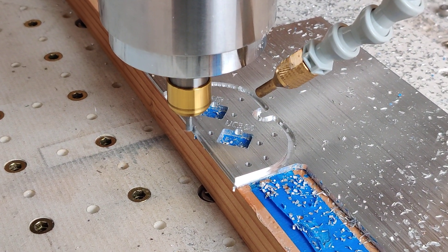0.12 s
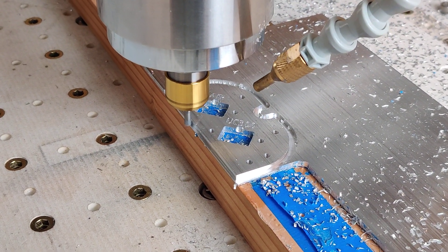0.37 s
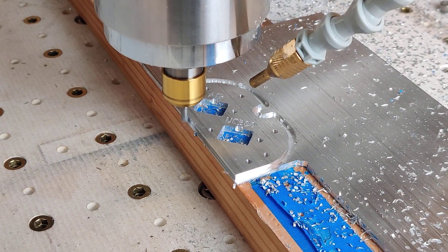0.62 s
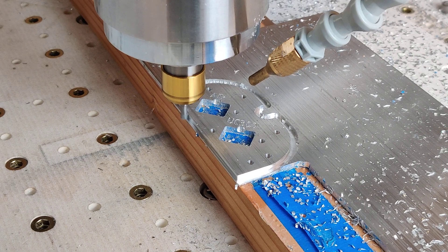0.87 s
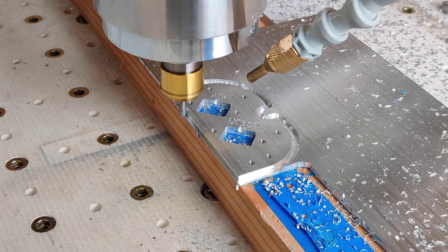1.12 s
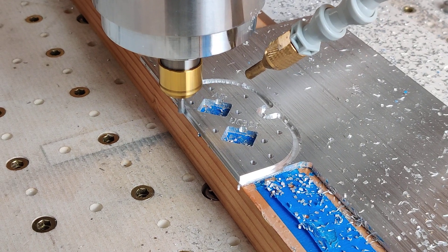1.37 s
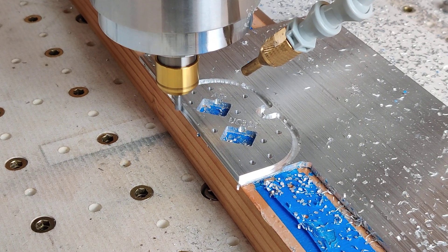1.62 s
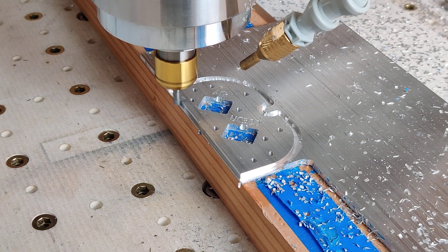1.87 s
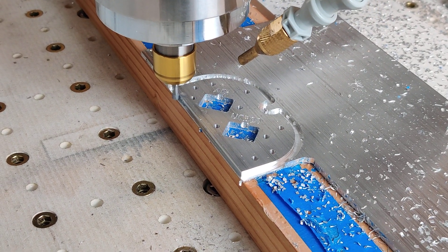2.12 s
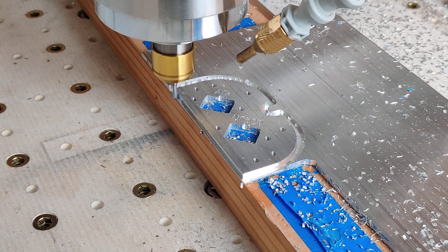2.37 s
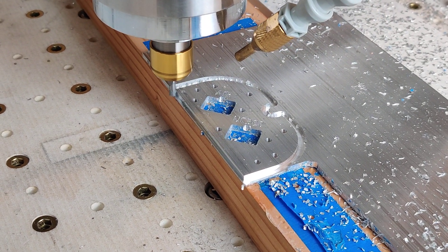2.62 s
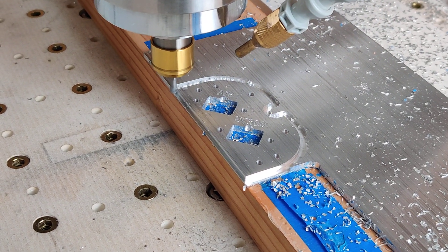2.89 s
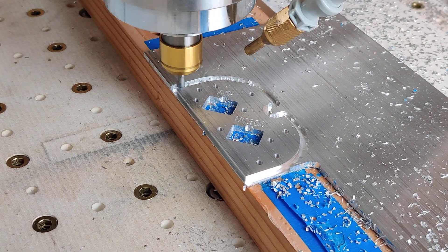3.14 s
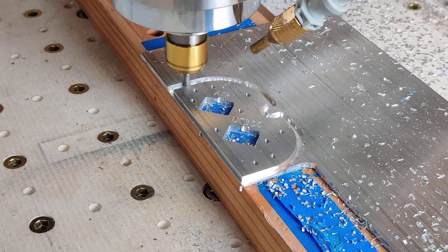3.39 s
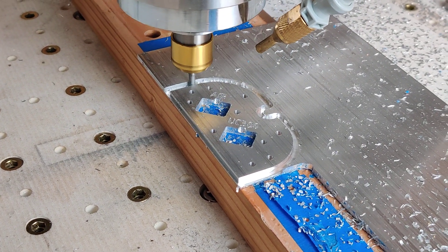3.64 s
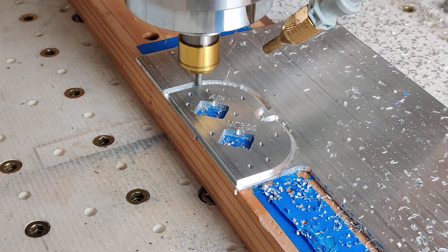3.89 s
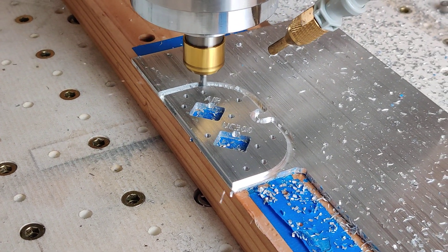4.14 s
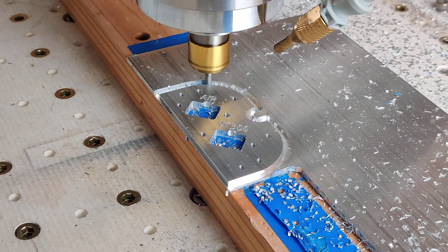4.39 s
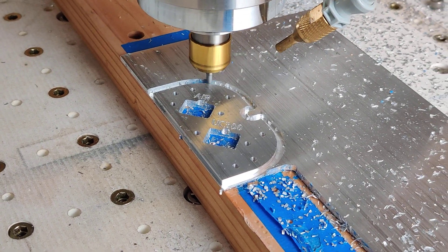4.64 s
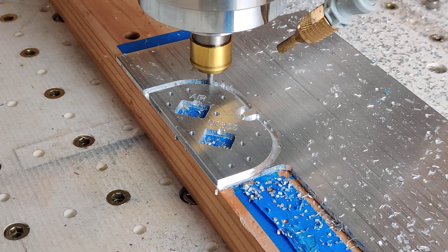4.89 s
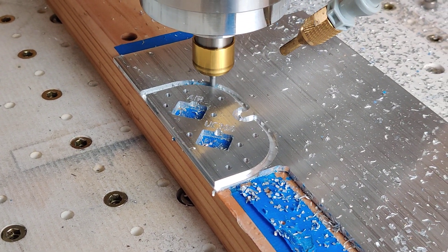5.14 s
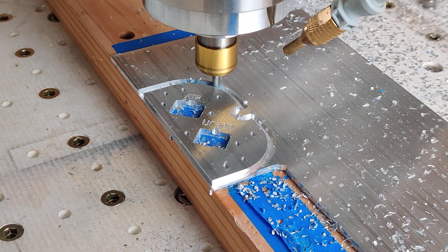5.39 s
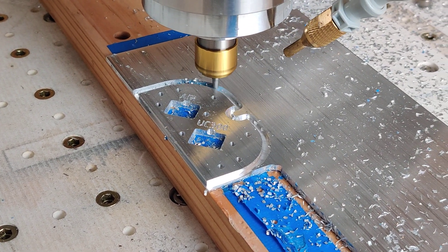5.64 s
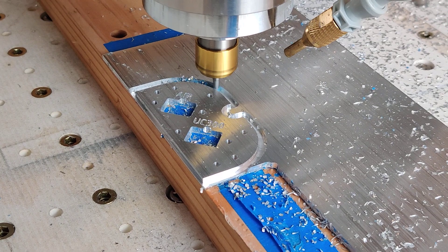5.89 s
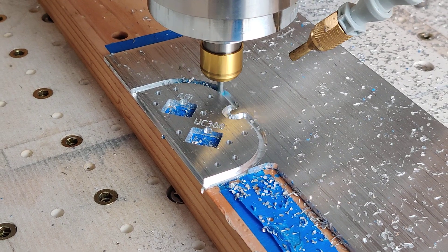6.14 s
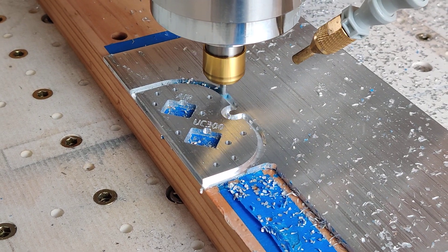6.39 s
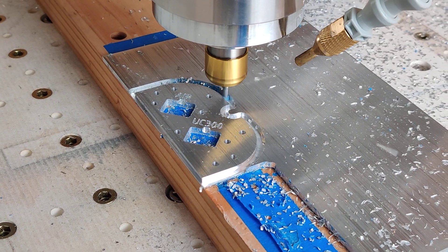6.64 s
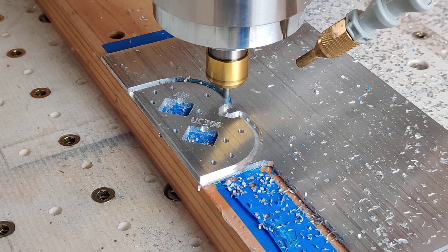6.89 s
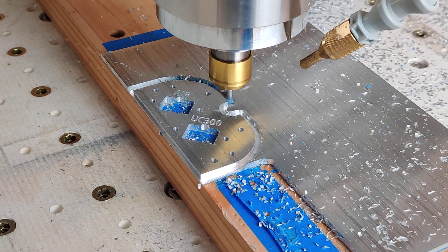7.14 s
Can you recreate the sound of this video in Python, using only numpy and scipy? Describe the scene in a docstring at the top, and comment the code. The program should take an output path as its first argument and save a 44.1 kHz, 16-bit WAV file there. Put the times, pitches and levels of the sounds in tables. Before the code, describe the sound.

Continuous workshop machining, heard in close stereo: an air nozzle hisses brightly, heavier on the right, with a thin high whistle. A spinning cutter drones on one fixed pitch in metal, rough with chips and shimmering overtones. It fades slightly, surges abruptly at three seconds, then settles to a middling level with flutter and brief knocks. Low compressor throbbing and mains hum remain faint underneath.

```python
"""Router milling aluminium

A router spindle turns nearly 400 times a second and its single flute mills an aluminium plate close to
a two-port microphone. The flute strikes once a turn, so the plate sings that rate and its overtones, while
torn chips ring the plate and knocks rattle in the groove. An air nozzle hisses and whistles on the cutter,
the drive whistles and a piston compressor throbs across the workshop with mains hum and a fan."""
import sys
import numpy as np
from scipy import signal
from scipy.fft import rfft, irfft
from scipy.io import wavfile
from scipy.ndimage import uniform_filter1d, map_coordinates

SR = 44100
rng = np.random.default_rng(int(sys.argv[2]) if len(sys.argv) > 2 else 0)


def level_to_linear(level):
    """Convert decibel levels to linear amplitude factors, elementwise."""
    exponent = np.asarray(level, float) / 20
    return 10 ** exponent


def output_pcm(signal):
    """Save a mono or channel-first signal as 16-bit PCM at the path in sys.argv[1].

    Samples are clipped to [-1, 1] before scaling.
    """
    pcm = np.clip(np.atleast_2d(signal).T, -1, 1) * 32767
    wavfile.write(sys.argv[1], SR, np.round(pcm).astype(np.int16))


N = 320166
TIME = np.arange(N) / SR
SIDES = np.array([[1], [-1]])  # left, right

# spindle: turns per second unloaded, and the sag when the strike is as loud as FULL_CUT_DB
FREE_HZ, SAG_HZ, FULL_CUT_DB = 399.66, .8, -17.5
# the cutter rounds a corner of the plate and bites deeper from then on
CORNER_S, CORNER_TAKES_S = 3.03, .04
# flute strike at the turning rate: (time [s], level [dB], left minus right [dB])
STRIKE = [(0, -28, -3), (.6, -28.5, -4.5), (1.4, -30, -5.5), (2.3, -32, -6.5), (2.98, -34.5, -7.5),
          (3.11, -22, -6.5), (3.4, -19, -5.5), (4.0, -17, -4.5), (4.12, -19, -5), (4.55, -18.5, -7),
          (4.7, -20.5, -6), (4.85, -23.5, -7), (5.3, -24.5, -6.5), (5.45, -26.5, -8.5), (5.8, -23.5, -7),
          (6.05, -27, -7), (6.5, -26, -8.5), (6.65, -23, -7), (6.9, -26, -8), (7.26, -25.5, -8)]
STRIKE_LEAD = 0.424  # left ahead of right [radians]
# brief dropouts of the strike tone: (time [s], half length [s], depth [0-1])
DROPOUTS = [(.49, .015, .3), (4.62, .015, .4), (6.715, .016, .6), (7.14, .020, .6)]
# an overtone swells while the cutter crosses a spot of the plate that favours it, on one side of the corner:
# (multiple of the turning rate, left [dB], right [dB], centre of swell [s], half length [s])
OVERTONES = [(2, -27.5, -23, 0.0, 0.963), (2, -40, -45.5, 2.5, 0.56), (2, -66.5, -33, 3.5, 0.674),
             (2, -23, -60, 4, 0.947), (2, -43.5, -32, 6, 1.22), (2, -30.5, -28, 7, 0.382),
             (3, -40, -32, 0.5, 0.64), (3, -33, -59.5, 4.5, 0.81), (3, -71.5, -31, 4.5, 0.965),
             (3, -49, -27.5, 6.5, 1.534), (4, -32.5, -33.5, 0.0, 3.1), (4, -39, -31.5, 1.81, 0.57),
             (4, -32, -41.5, 3.5, 1.41), (4, -41.5, -40, 5, 1.07), (4, -35.5, -43.5, 7, 1.97),
             (5, -29.0, -31, 0.5227, 1.5), (5, -51.5, -42.0, 3, 0.18), (5, -37.5, -39.5, 4.5, 4.4),
             (5, -38.5, -38.5, 4.5, 0.263), (5, -43, -39.5, 5.5, 0.506), (6, -51.5, -43.5, -0.9, 3.49),
             (6, -55, -42, 2, 0.4), (6, -47, -37, 3, 4.3), (7, -48, -32, 0.0, 0.695),
             (7, -33.5, -33.5, 1.3063, 1.19), (7, -45.5, -45.5, 4.5, 0.268), (7, -39.5, -38, 5.5, 3.07),
             (8, -38.5, -60.0, -0.5, 0.7), (8, -56, -38.5, 3, 1.35), (8, -45, -32, 3.5, 1.09),
             (8, -42.0, -40.5, 2, 4.0), (9, -46, -51, 1.5, 3.0), (9, -45, -42, 4.0, 1.0),
             (10, -36, -33.5, -0.77, 2.3), (11, -55.5, -31, 0.91, 1.27), (11, -49.5, -37, 4, 0.86),
             (12, -38, -43.5, 0.93, 1.7), (13, -43.5, -33.5, 1.86, 0.49), (13, -49, -47.5, 7.5, 3.0),
             (14, -46.5, -40.5, 0.92, 1.22), (15, -57.5, -27.5, 0.0, 1.73), (15, -59.5, -42.0, 6.5, 1.54),
             (16, -56.5, -40.5, 2.35, 1.4), (16, -53, -37, 4, 0.82), (17, -51.5, -32, 0.82, 2.1),
             (17, -52, -45, 5, 2.3), (18, -49.0, -36.5, 1, 2.8), (19, -60.0, -33, 0.17, 0.97),
             (19, -55.5, -25, 1.87, 0.81), (19, -55, -35, 3.5, 1.53), (20, -45, -28.5, 2.16, 0.94),
             (21, -57.0, -33.5, 2.5, 0.6), (22, -55.0, -38.0, 3, 3.2), (22, -55.0, -40.0, 3.5, 3.0)]
# left lead of an overtone; unlisted multiples lead by chance:
# multiple of the turning rate: (before the corner [radians], after it [radians])
PLATE_LEADS = {3: (1.2, 2.2), 4: (-2.0, -1.9), 5: (-.4, -.9), 6: (.5, .7), 7: (.2, .1), 8: (3.0, 1.5),
               10: (1.5, 2.5), 12: (1.3, 2.0), 13: (1.9, 1.2), 15: (2.9, 2.9), 19: (-2.6, 3.0),
               20: (-.8, 3.0)}
# the octave's left lead turns as the cutter travels: (time [s], lead [radians])
OCTAVE_LEAD = [(0, -.25), (3.0, 1.0), (3.5, .6), (4.6, .9), (5.8, 3.1), (6.0, 2.8), (6.5, .3), (7.26, .3)]
LAG_TURNS = .027  # the plate delays the phase of overtone k by this times k squared, smearing the strike
# highest, faint overtones: (multiple of the turning rate, left [dB], right [dB])
TOP_OVERTONES = [(23, -60.5, -52), (25, -59, -52), (28, -57.5, -48), (30, -49.5, -46.5), (35, -51.5, -41),
                 (36, -48, -54.5), (37, -44, -51), (38, -46.5, -49.5), (39, -43.5, -49.5)]
# broad rings of plate and table under uneven chips: (centre [Hz], width [Hz], left [dB], right [dB])
PLATE_RINGS = [(436.9, 42, -7.5, -2), (748.5, 94, -7, -5.5), (875.4, 42, -20.5, -9), (1656, 265, -5, -9),
               (2005.5, 204, -1, -3), (3127, 216, -2.5, 0.5), (6270, 2450, -2.5, 7.5)]
CHIP_DB, CHIP_FOLLOW = -26.5, 0.81  # base level [dB], chip dB per dB of strike
# knocks of the cutter in the groove: (time [s], time scale of burst [s], low rings [dB], high rings [dB])
RATTLES = [(3.620, 0.01, -43, -27), (4.175, .03, -47.5, -28.5), (5.412, 0.0135, -37, -28.5),
           (5.440, 0.0074, -42, -21), (5.459, 0.0091, -30, -26.5), (5.542, 0.0087, -32, -21),
           (5.562, 0.0076, -45.5, -31), (5.619, .006, -41, -23), (5.634, 0.0124, -26, -37),
           (5.656, 0.0102, -27.5, -20.5), (5.680, 0.0081, -34, -33.5), (5.915, .008, -37, -28.5),
           (6.105, 0.0059, -42, -21.5), (6.806, .012, -34, -33), (6.835, 0.011, -38.5, -39)]
# rings of those knocks, three low then three high: (centre [Hz], width [Hz], level [dB])
RATTLE_RINGS = [(256, 152, -2.5), (500, 123, 3), (893, 182, 2), (1480, 418, -2.5), (2089, 244, -1),
                (2875, 1420, 2.5)]
# air jet: (time [s], level [dB], left minus right [dB])
JET = [(0, -21, -5.5), (.9, -20.5, -7), (1.2, -21, -7), (2.4, -21, -8), (3.0, -20, -7.5), (3.6, -21.5, -6),
       (4.6, -20.5, -8), (5.4, -21, -7.5), (6.5, -21, -6.5), (7.26, -20, -7.5)]
# jet colour at the left port: (frequency [Hz], density [dB per Hz])
JET_LEFT = [(30, -83.5), (150, -81), (600, -73.5), (850, -77.5), (1400, -68.5), (1800, -91), (2500, -65.5),
            (2900, -68.5), (4000, -61), (5000, -66), (5700, -72.5), (7500, -77.5), (9000, -67.5),
            (11000, -61.5), (12800, -62.5), (14300, -61.5), (15700, -53)]
# jet colour at the right port: (frequency [Hz], density [dB per Hz])
JET_RIGHT = [(30, -63), (150, -77.5), (600, -71), (850, -65.5), (1400, -68), (2500, -64.5), (3400, -64.5),
             (5000, -59), (7000, -57), (8000, -57), (9300, -65.5), (10200, -60), (11000, -55.5),
             (12500, -58), (14000, -57), (15700, -55.5)]
JET_BELOW_DB, JET_PAN_DB = -19, -6.5  # level and balance at which those colours hold
JET_FLOOR_HZ = 50
# likeness of the jet at the two ports: (frequency [Hz], share [0-1])
LIKENESS = [(60, .97), (300, .8), (700, .65), (1500, .4), (4000, .38), (9000, .5), (14000, .48)]
# paths by which the jet reaches the left port: (delay after the right port [s], gain)
JET_PATHS = [(-.00016, .7), (.00018, -.55), (-.00043, .45)]
# reflections of the jet off table, plate and spindle body, moving with the head:
# (first delay [s], last delay [s], gain)
JET_ECHOES = [(.00062, .00056, .1), (.0011, .0009, .12), (.0027, .0021, .14), (.0040, .0036, .14),
              (.0061, .0052, .12)]
# jet whistle at the right port, before the jet's own level: (time [s], centre [Hz], level [dB])
WHISTLE = [(0, 11690, -30), (1.2, 11720, -22), (2.9, 11990, -22.5), (3.4, 11730, -37), (4.2, 11850, -37),
           (4.7, 11900, -22.5), (5.2, 11950, -23.5), (5.6, 12000, -27), (6.4, 12430, -23),
           (7.26, 12400, -29.5)]
WHISTLE_WIDTH_HZ = 325
# switching tone of the drive: (time [s], level [dB])
DRIVE = [(0, -37.5), (1.2, -39), (2.1, -35.5), (2.8, -33), (3.2, -39), (3.6, -45.5), (7.26, -41)]
DRIVE_HZ = 6000.2
# compressor strokes: (multiple of the stroke rate, level over the hum level [dB])
STROKES = [(1, -18), (2, 0.5), (3, -11.5), (4, -6.5), (5, -17.5), (6, -20.5), (7, -6), (8, -11), (9, -21),
           (11, -21)]
STROKE_HZ = 28.62
# mains hum and a fan: (frequency [Hz], level over the hum level [dB])
HUMS = [(120.1, -10), (175, -12.5), (240.2, -20.5)]
# wavering level shared by strokes, hum and fan: (time [s], level [dB])
HUM_LEVEL = [(0.0, -42), (0.22, -42), (2.95, -40.5), (3.58, -43.5), (6.89, -42), (7.26, -42)]
HUM_PAN_DB = -6
# everything at a port dips or swells briefly: (time [s], left [dB], right [dB])
LEVEL_BUMPS = [(0.16, 1, 0.5), (0.59, -4.5, -0.46), (0.89, -2, 0.33), (1.45, 2.5, 1.36), (1.74, 0, 0.5),
               (2.3, -1, 0.4), (2.47, -0.5, -1.2), (2.84, -1.16, 1.18), (3.06, -1.86, 1.0),
               (4.17, 0.5, 0.5), (4.31, -2.9, -2), (4.5, 0.16, -2.5), (4.69, -2.5, 0), (4.82, 1.5, -1),
               (5.11, 2.4, 0.3), (5.28, 2, -0.85), (5.4, 0.14, 1.1), (5.69, -4.5, -1.48), (6.36, -3.02, -1),
               (6.77, 0.33, 1.51), (7.06, -2, -1.66)]
BUMP_HALF_S = 0.0615
TOP_HZ = 15745


def curves(table):
    """Columns of a table, joined by straight lines in time."""
    s, *columns = np.transpose(table)
    return [np.interp(TIME, s, column) for column in columns]


def pair(left, right):
    """A left and a right value, stacked as two rows."""
    return np.array([[left], [right]])


def ports(pan_db):
    """Left and right gains whose mean is one."""
    ratio = level_to_linear(pan_db)
    left, right = 2 * ratio / (1 + ratio), 2 / (1 + ratio)
    return np.reshape(np.array([left, right]), (2, -1))


def walk(rate):
    """Random levels held 1 / rate s and slewed twice; spread near 1."""
    hold = int(SR / rate)
    steps = np.repeat(rng.standard_normal(N // hold + 1), hold)
    slewed = uniform_filter1d(uniform_filter1d(steps, hold), hold)
    return 1.19 * slewed[:N]


def bump(s, half_s):
    """A bell in time that peaks at 1 and falls to 1/e half_s away on either side."""
    return np.exp(-((TIME - s) / half_s) ** 2)


def ring(x, hz, width_hz):
    """A resonance applied twice; white noise of rms 1 leaves it with rms near 1."""
    b, a = signal.iirpeak(hz, hz / width_hz, SR)
    twice = signal.lfilter(b, a, signal.lfilter(b, a, x))
    return twice * np.sqrt(2 * SR / np.pi / width_hz)


def tone(turns, db, lead):
    """A sine of given rms at both ports, the left one ahead by lead radians."""
    left_only = (SIDES + 1) / 2
    return np.sqrt(2) * level_to_linear(db) * np.sin(2 * np.pi * turns + lead * left_only)


def cutter(uneven_db=0.5877, slip=0.0048):
    """One strike a turn; chip thickness varies, so strike and overtones flutter together as load sags the spin."""
    strike_db, pan_db = curves(STRIKE)
    spin_hz = FREE_HZ - SAG_HZ * level_to_linear(strike_db - FULL_CUT_DB)
    turns = np.cumsum(spin_hz) / SR + slip * walk(60)
    flutter = uneven_db * walk(45)
    gap = 1 - sum(depth * bump(s, half) for s, half, depth in DROPOUTS)
    strike = gap * ports(pan_db) * tone(turns - 1 / 4, strike_db + flutter, STRIKE_LEAD)
    return strike + overtones(turns, flutter) + top_overtones(turns, flutter) + chips(strike_db, turns)


def overtones(turns, flutter, own_db=0.48, deep_db=0.7779):
    """Plate overtones locked to the strike swell spot by spot and flutter a little alone, more in the deep cut."""
    deep = np.clip((TIME - CORNER_S) / CORNER_TAKES_S, 0, 1)
    swell = {}
    for k, left, right, s, half in OVERTONES:
        side_of_corner = deep if s > CORNER_S else 1 - deep
        spot = bump(s, half) * side_of_corner
        swell[k] = swell.get(k, 0) + level_to_linear(pair(left, right)) * spot
    out = 0
    for k, size in swell.items():
        chance = 2 * np.pi * rng.random()
        own = own_db * walk(25) + deep_db * k ** .5 * deep * walk(70)
        before, after = PLATE_LEADS.get(k, (chance, chance))
        lead = curves(OCTAVE_LEAD)[0] if k == 2 else np.where(TIME < CORNER_S, before, after)
        out = out + size * tone(k * turns - 1 / 4 - LAG_TURNS * k ** 2, flutter + own, lead)
    return out


def top_overtones(turns, flutter):
    """The faint highest multiples of the turning rate, each drifting slowly in level."""
    out = 0
    for k, left, right in TOP_OVERTONES:
        db = pair(left, right) + flutter + 3.1 * walk(1.2)
        out = out + tone(k * turns, db, 2 * np.pi * rng.random())
    return out


def chips(strike_db, turns):
    """Tearing chips, a puff of noise each turn, ring the plate; they grow with the cut."""
    puff = 1 + 0.406 * np.cos(2 * np.pi * turns)
    tear = rng.standard_normal(N) * puff * level_to_linear(2.84 * walk(26))
    rings = 0
    for k, (hz, width, left, right) in enumerate(PLATE_RINGS):
        polarity = (-1) ** k  # neighbouring rings oppose
        rings = rings + polarity * level_to_linear(pair(left, right)) * ring(tear, hz, width)
    return rings * level_to_linear(CHIP_DB + CHIP_FOLLOW * strike_db)


def rattles():
    """Each knock is a short burst of noise through low and high rings."""
    knocks = rng.standard_normal((2, N))
    knocks[0] = 0.73 * knocks[1] + 0.62 * knocks[0]  # the ports are partly alike
    rings = [level_to_linear(db) * ring(knocks, hz, width) for hz, width, db in RATTLE_RINGS]
    low, high = np.zeros(N), np.zeros(N)
    for s, scale, low_db, high_db in RATTLES:
        age = np.maximum(TIME - s, 0) / scale
        shape = 1.6 * np.minimum(4 * age, 1) * np.exp(-age / 1.45)
        low += level_to_linear(low_db) * shape
        high += level_to_linear(high_db) * shape
    return (low * sum(rings[:3]) + high * sum(rings[3:])) * ports(-6.0) / 2


def jet():
    """Air breaking on the cutter: flickering hiss, its moving reflections and a whistle at the right port."""
    out = jet_echoes(jet_hiss())
    out[1] += jet_whistle()
    level_db, pan_db = curves(JET)
    return out * level_to_linear(level_db - JET_BELOW_DB + SIDES * (pan_db - JET_PAN_DB) / 2)


def jet_hiss(flicker_db=1.0, drift_db=.5, gust_db=0.6833):
    """Coloured noise in half-octave bands that flicker at each port, most alike at both ports in the bass."""
    hz = np.maximum(np.arange(N // 2 + 1) * SR / N, 1)

    def along(table):
        """A table joined by straight lines over log frequency."""
        table_hz, values = np.transpose(table)
        return np.interp(np.log(hz), np.log(table_hz), values)

    like = np.clip(along(LIKENESS), 0, 1)
    right, other = rfft(rng.standard_normal((2, N)))
    # the bass reaches both ports alike, the treble by several paths
    treble = np.clip(hz / 3000, 0, 1)
    paths = sum(gain * np.exp(-2j * np.pi * hz * lag) for lag, gain in JET_PATHS)
    late = right * (1 - treble + treble * paths)
    noise = np.array([like * late + np.sqrt(1 - like ** 2) * other, right])
    noise = noise * level_to_linear(np.array([along(JET_LEFT), along(JET_RIGHT)])) * np.sqrt(SR / 2)
    noise = noise / (1 + (JET_FLOOR_HZ / hz) ** 8)
    out, gust = 0, gust_db * walk(10)
    for octave in np.arange(5, 14.5, .5):  # band centre is 2 ** octave Hz
        band = np.clip(1 - 2 * np.abs(np.log2(hz) - octave), 0, 1)
        flicker = np.array([flicker_db * walk(18) + drift_db * walk(1.948) + gust for _ in SIDES])
        out = out + irfft(noise * np.sqrt(band), N) * level_to_linear(flicker)
    return out


def jet_echoes(out):
    """Reflections with gliding delays comb the hiss; each also reflects the ones before it."""
    for first, last, gain in JET_ECHOES:
        place = np.arange(N) - SR * np.linspace(first, last, N)
        echo = np.array([map_coordinates(side, [place], order=3, mode="wrap") for side in out])
        out = out + gain * echo
    return out


def jet_whistle():
    """Slow noise on a carrier makes a narrow band that can drift."""
    centre_hz, whistle_db = curves(WHISTLE)
    lowpass = signal.butter(2, WHISTLE_WIDTH_HZ / 2, fs=SR, output="sos")
    slow = signal.sosfilt(lowpass, rng.standard_normal((2, N)))
    phase = 2 * np.pi * np.cumsum(centre_hz) / SR
    band = slow[0] * np.cos(phase) + slow[1] * np.sin(phase)
    return level_to_linear(whistle_db) * band / np.std(slow)


def workshop():
    """Compressor strokes, mains hum and fan as wavering sines, with the drive's steady-pitched switching tone."""
    # the multiples keep step, so each stroke is a thump that the room smears
    lines = [(k * STROKE_HZ, db, np.pi / 2 + 0.0597 * k * k) for k, db in STROKES]
    lines += [(hz, db, 0) for hz, db in HUMS]
    hum = 0
    for hz, db, start in lines:
        hum = hum + np.sqrt(2) * level_to_linear(db + .5 * walk(2.99)) * np.sin(2 * np.pi * hz * TIME + start)
    drive = ports(-16) * tone(DRIVE_HZ * TIME, curves(DRIVE)[0], 1.3)
    return hum * level_to_linear(curves(HUM_LEVEL)[0]) * ports(HUM_PAN_DB) + drive


def scene():
    """Cutter, rattles, air jet and workshop together, with the brief level changes at each port."""
    bump_db = sum(pair(left, right) * bump(s, BUMP_HALF_S) for s, left, right in LEVEL_BUMPS)
    return (cutter() + rattles() + jet() + workshop()) * level_to_linear(bump_db)


def roll_off(x):
    """The treble ends steeply here."""
    return signal.sosfilt(signal.butter(12, 17100, fs=SR, output="sos"), x)


def record(dry):
    """The recorder cuts everything from TOP_HZ up, steeply."""
    below_top = np.arange(N // 2 + 1) * SR / N < TOP_HZ
    mix = irfft(rfft(dry) * below_top, N)
    return roll_off(mix)


dry = scene()
out = record(dry)
output_pcm(out)
```